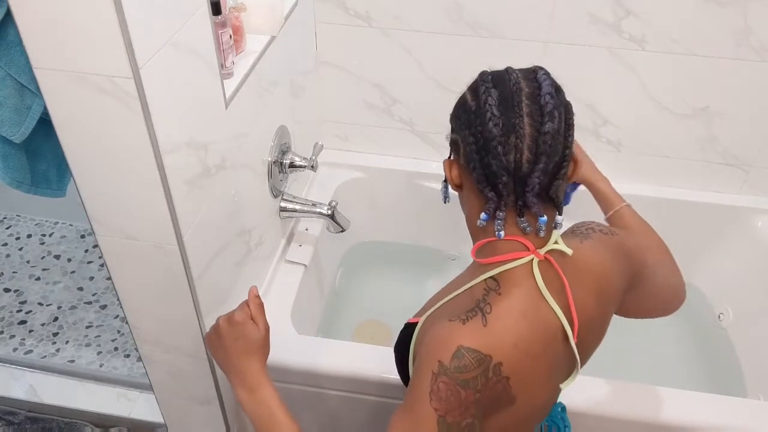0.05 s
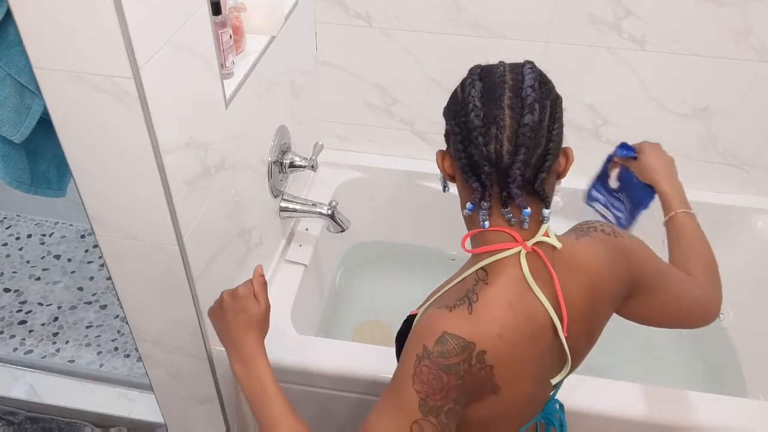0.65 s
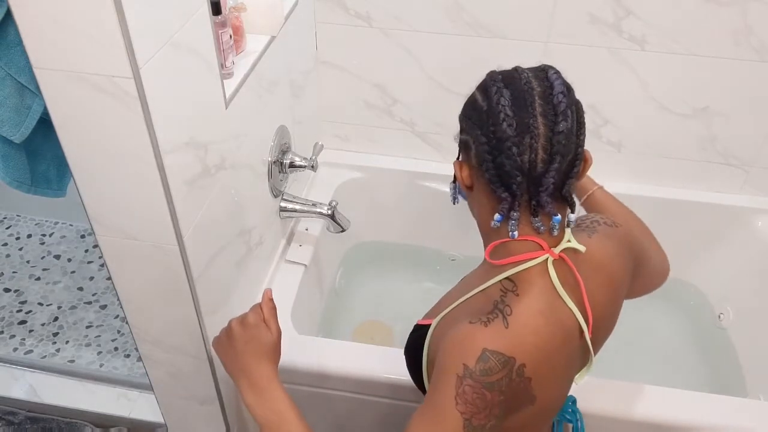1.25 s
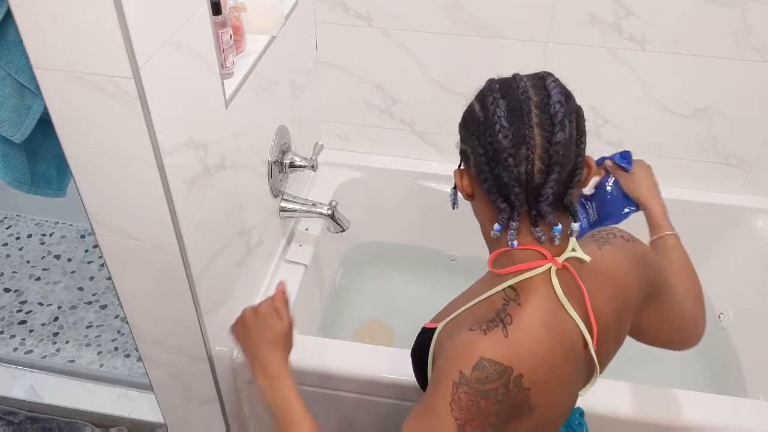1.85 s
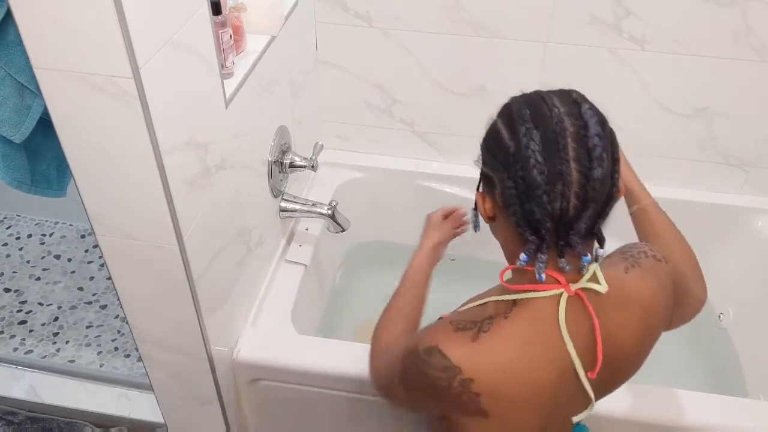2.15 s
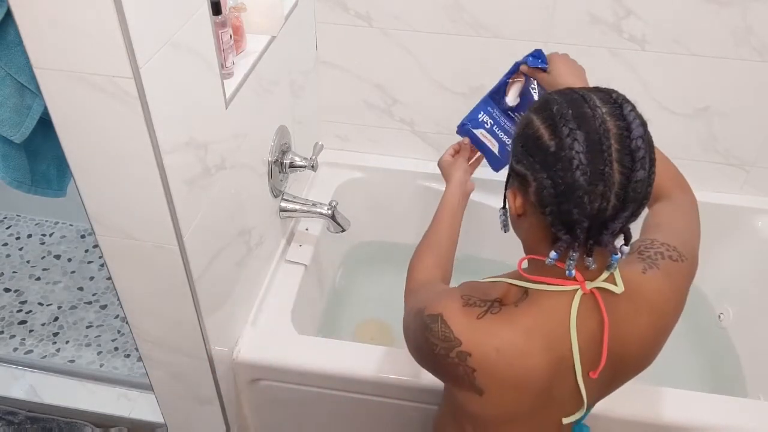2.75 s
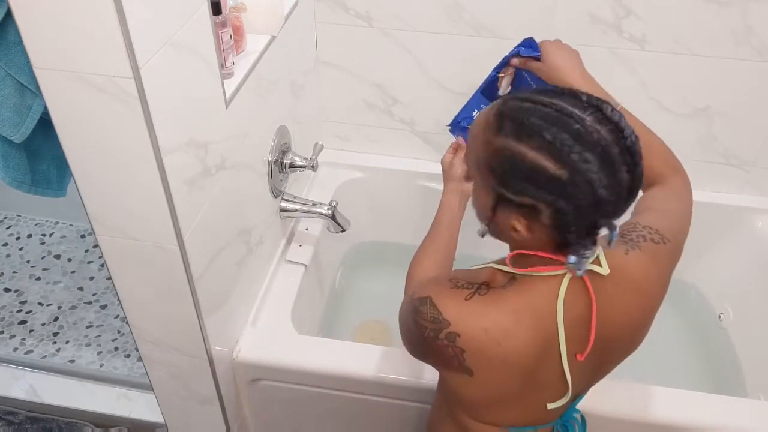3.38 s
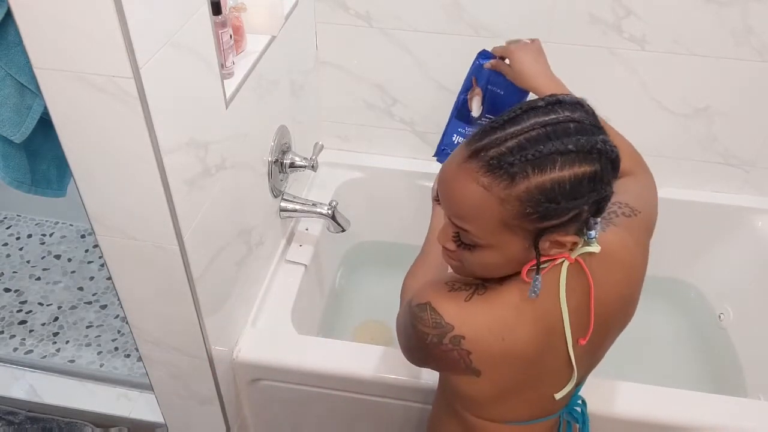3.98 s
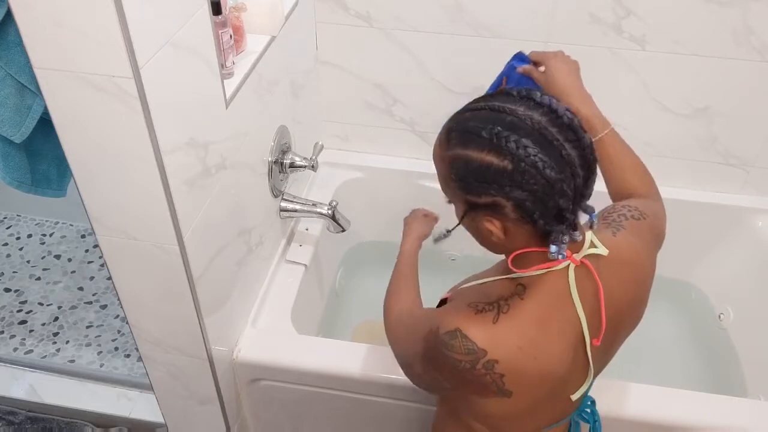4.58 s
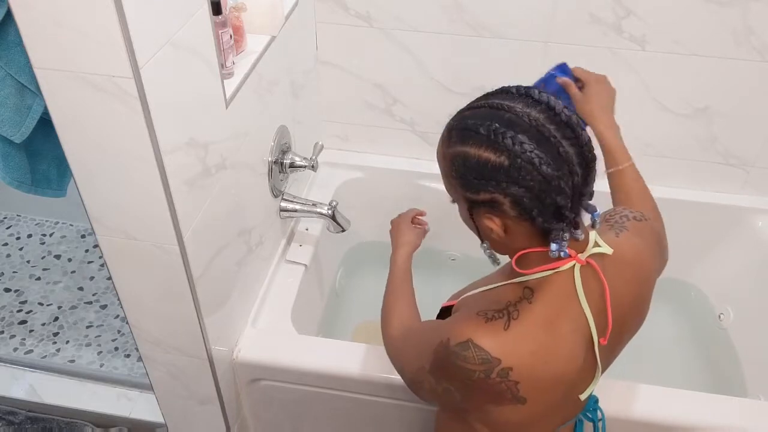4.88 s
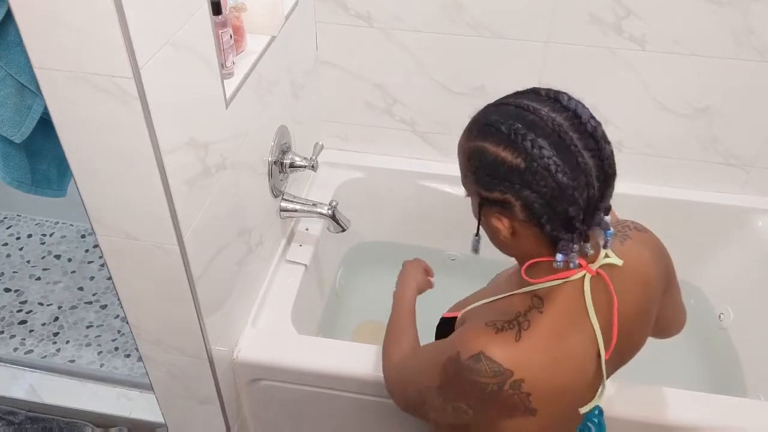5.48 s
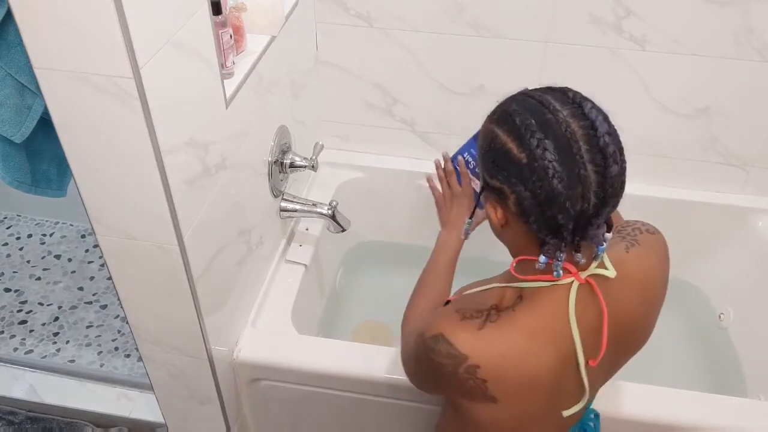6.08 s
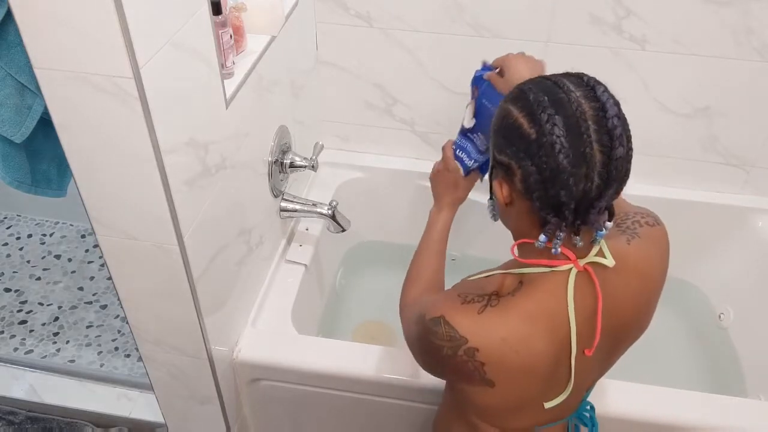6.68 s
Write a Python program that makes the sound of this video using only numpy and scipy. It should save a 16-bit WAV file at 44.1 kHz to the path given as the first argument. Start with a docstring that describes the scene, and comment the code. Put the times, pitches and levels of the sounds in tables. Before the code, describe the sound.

A stiff plastic pouch is shaken and crumpled, sending bursts of salt crystals hissing into bathwater, with a few small plinks.

```python
"""A bright patter of bath salt, running from a plastic pouch into a filled tub in a small, hard-walled room.
The crystals hit the water and pull down tiny bubbles that fizz; now and then a larger one plinks.
The pouch is turned over, crumpled and shaken, so the salt comes in spurts. Its stiff film crackles
and snaps and its panels thump, over a faint rumble of the house."""
import sys
import numpy as np
from scipy import signal
from scipy.fft import rfft, irfft
from scipy.io import wavfile

SR = 44100
rng = np.random.default_rng(int(sys.argv[2]) if len(sys.argv) > 2 else 0)


def store_pcm(level_fs):
    """Save levels as 16-bit WAV."""
    pcm = np.round(np.clip(level_fs, -1, 1) * 32767).astype(np.int16)
    wavfile.write(sys.argv[1], SR, np.atleast_2d(pcm).T)


N = 296748
TIME = np.arange(N) / SR


def from_db(db):
    """Decibels to gain."""
    return 10 ** (np.asarray(db) / 20)


def unit_rms(x):
    """Scale to unit power."""
    return x / np.sqrt(np.mean(x ** 2) + 1e-20)


def automation(points):
    """A curve of (time_s, value) points, read at every sample."""
    return np.interp(TIME, *np.transpose(points))


def at_hz(points, hz):
    """Read a table along a logarithmic frequency axis."""
    freqs, values = np.transpose(points)
    return np.interp(np.log(np.maximum(hz, 1)), np.log(freqs), values)


def add(track, start_s, sound):
    """Lay a sound into a track."""
    start = int(np.clip(start_s * SR, 0, N - 1))
    track[start:start + len(sound)] += sound[:N - start]


def drift(rate_hz):
    """Slow random wobble of unit power."""
    hop, settle = 40, 2000
    pole = np.exp(-2 * np.pi * rate_hz * hop / SR)
    noise = rng.standard_normal(N // hop + settle + 2)
    slow = signal.lfilter([1], [1, -2 * pole, pole * pole], noise)[settle:]
    return np.interp(np.arange(N) / hop, np.arange(len(slow)), unit_rms(slow))


def colour(x, spectrum, size=4096):
    """Minimum-phase EQ with the given shape; white input keeps its power."""
    hz = np.abs(np.fft.fftfreq(size, 1 / SR))
    log_gain = np.log(from_db(at_hz(spectrum, hz)))
    response = np.fft.ifft(np.exp(np.conj(signal.hilbert(log_gain)))).real[:size // 2]
    return signal.oaconvolve(x, response / np.linalg.norm(response))[:N]


def resonate(x, pitch_hz, width_hz):
    """One resonance; white input keeps its power."""
    radius = np.exp(-np.pi * width_hz / SR)
    feedforward = np.sqrt((1 - radius ** 2) / 2) * np.array([1, 0, -1])
    feedback = [1, -2 * radius * np.cos(2 * np.pi * pitch_hz / SR), radius ** 2]
    return signal.lfilter(feedforward, feedback, x + 1e-18)


def grains(per_s, spread_db):
    """Random clicks of uneven size, with unit mean power at any rate."""
    chance = np.clip(per_s / SR, 1e-5, 1)
    sizes = from_db(spread_db * np.minimum(rng.exponential(1, N), 4.5)) * rng.choice([-1, 1], N)
    return (rng.random(N) < chance) * unit_rms(sizes) / np.sqrt(chance)


def with_swells(bed_db, swells, rise_share):
    """Level in dB of a bed plus swells, each with an attack that is a share of its fall time."""
    power = from_db(bed_db) ** 2
    for peak_s, level_db, fall_s in swells:
        near = slice(*np.searchsorted(TIME, [peak_s - 10 * fall_s, peak_s + 10 * fall_s]))
        age = (TIME[near] - peak_s) / fall_s
        envelope = np.exp(-np.where(age < 0, (age / rise_share) ** 2 / 2, age))
        power[near] += (from_db(level_db) * envelope) ** 2
    return 10 * np.log10(power)


# tone of the quiet house: freq_hz, gain_db
ROOM_TONE_EQ = [(15, -32), (27, -17), (42, 7), (65, -11), (110, -0.5), (150, -12), (230, -5.5),
                (400, -17.5), (1000, -20), (3000, -17.5), (8000, -22.5), (15000, -24.5)]


def room_tone():
    """Faint rumble and hiss of the house, partly shared by both channels."""
    common, left, right = (colour(white, ROOM_TONE_EQ) for white in rng.standard_normal((3, N)))
    return from_db(-67.5) * (common + 0.71 * np.array([left, right]))


# reverb time of the bathroom: freq_hz, t60_s
REVERB_DECAY = [(100, 1), (500, 0.49), (2000, 0.33), (6000, 0.62), (15000, 0.22)]
# how alike the reverb is left and right: freq_hz, correlation
REVERB_LIKENESS = [(100, 0.65), (350, 0.9), (700, 0.18), (1400, -0.058), (3000, 0.07), (12000, -0.053)]
# lean of the stereo image: freq_hz, left_over_right_db
BALANCE = [(100, 5), (1000, 2), (5000, 2), (8000, 2), (12000, -1.8)]


def bathroom(x, direct_db, early_boost, early_s, size=16384):
    """A sound from one spot: a weak direct path, then dense echoes off tub and tile."""
    t, response = TIME[:size], np.zeros((2, size))
    hz = np.fft.rfftfreq(size, 1 / SR)
    octave = np.log2(np.clip(hz, 125, 16000) / 125)
    noise = rfft(rng.standard_normal((2, size)))
    sides = np.array([[1], [-1]])
    for k in range(8):
        centre_hz, band = 125 * 2 ** k, np.maximum(1 - np.abs(octave - k), 0)
        mid, side = irfft(noise * band)
        alike = at_hz(REVERB_LIKENESS, centre_hz)
        echoes = np.sqrt((1 + alike) / 2) * mid + np.sqrt((1 - alike) / 2) * side * sides
        decay = np.exp(-np.log(1000) * t / at_hz(REVERB_DECAY, centre_hz))
        decay *= 1 + early_boost * np.exp(-t / early_s)  # the tub walls answer first
        response += echoes * decay / np.linalg.norm(decay)
    # the direct sound reaches the left a few samples sooner
    response[[0, 1], [0, rng.integers(3, 12)]] += from_db(direct_db)
    response = irfft(rfft(response) * from_db(sides * at_hz(BALANCE, hz) / 2))
    return signal.fftconvolve(x[None], response, axes=1)[:, :N]


def scatter(x, dwell_s, spots=12):
    """Hits and creases crossfade from spot to spot, each with its own pattern of echoes."""
    visits = np.concatenate([rng.permutation(spots) for _ in range(200)])
    step = TIME / dwell_s
    now, fade = step.astype(int), step % 1 * np.pi / 2
    leaving, arriving = x * np.cos(fade), x * np.sin(fade)
    out = np.zeros((2, N))
    for spot in range(spots):
        part = leaving * (visits[now] == spot) + arriving * (visits[now + 1] == spot)
        out += bathroom(part, direct_db=-10, early_boost=1, early_s=0.031)
    return out


# how hard the hands work the pouch, the bed under thumps and creases: time_s, level_db
HANDLING_LEVEL = [(0, -56), (1.0, -53.5), (1.4, -48.5), (1.82, -55.5), (2.2, -76), (2.6, -51.5),
                  (3.25, -43), (3.9, -53.5), (4.15, -60), (4.6, -58.5), (5.04, -67), (5.12, -49),
                  (5.6, -51.5), (5.95, -69.5), (6.17, -54), (6.35, -63.5), (6.46, -43.5), (6.73, -60)]
# lurches of the pouch: peak_s, deep_db, panel_db, fall_s
POUCH_LURCHES = [(0.82, -62, -78, 0.033), (1.33, -77, -64, .06), (2.485, -56.5, -51, 0.039),
                 (2.76, -63.5, -62, 0.18), (3.03, -74, -50, 0.087), (3.18, -59, -59, .07),
                 (3.385, -58, -56, 0.099), (3.66, -56, -55, 0.065), (3.91, -65, -53.5, 0.052),
                 (4.25, -60, -65, 0.049), (6.04, -64, -66, .04), (6.12, -65, -65, 0.11),
                 (6.41, -61.5, -63.5, 0.12), (6.68, -64, -59, 0.097)]
# low resonances of tub and room: pitch_hz, width_hz, gain_db
LOW_MODES = [(44.7, 24, -5.5), (90.6, 12, 3.5), (119, 27, -4.5), (167.4, 15, -2.5), (226, 5.2, -2.5),
             (275.7, 8.9, 4.5), (316, 20, -9), (433, 62, -3)]


def pouch_thumps():
    """The swaying, lurching pouch drives the low resonances: its bulk the deepest, its panels the rest."""
    handling_db = automation(HANDLING_LEVEL)
    deep_swells = [(s, db, fall_s) for s, db, _, fall_s in POUCH_LURCHES]
    panel_swells = [(s, db, fall_s) for s, _, db, fall_s in POUCH_LURCHES]
    deep_db = with_swells(handling_db - 22, deep_swells, rise_share=0.55)
    panel_db = with_swells(handling_db - 21, panel_swells, rise_share=0.55)
    push = grains(900, spread_db=1)
    deep, panel = from_db(deep_db - 5.5) * push, from_db(panel_db - 7.5) * push
    return sum(from_db(gain_db) * resonate(deep if hz < 150 else panel, hz, width_hz)
               for hz, width_hz, gain_db in LOW_MODES)


# squeezes that crumple the film: peak_s, level_db, fall_s
POUCH_SQUEEZES = [(0.28, -50.5, .06), (0.85, -45, .025), (1.44, -51, .04), (2.335, -51.5, 0.05),
                  (2.485, -46.5, 0.036), (3.025, -40, 0.037), (3.2, -41, 0.051), (3.635, -40, .075),
                  (3.965, -43.5, 0.068), (4.22, -47, 0.028), (5.23, -54, .04), (5.53, -50, .04),
                  (6.048, -40.5, 0.011), (6.135, -47.5, 0.033), (6.455, -46, 0.043), (6.59, -45, 0.019),
                  (6.685, -41, .03)]
# midrange body of the film: freq_hz, gain_db
FILM_EQ = [(100, -31.5), (250, -20.5), (430, -6.5), (600, 0.5), (760, 0.5), (980, 3), (1170, -4),
           (1420, 7.5), (1950, 0), (3000, 0), (6000, -39), (15000, -23)]


def film_creases():
    """The film crumples in many small creases, loudest at each squeeze."""
    crumple_db = with_swells(automation(HANDLING_LEVEL), POUCH_SQUEEZES, rise_share=0.39)
    envelope = from_db(crumple_db - 1.5 + 1.2 * drift(rate_hz=9.4))
    return colour(envelope * grains(1800, spread_db=4), FILM_EQ)


# buckles and shakes of the pouch: start_s, level_db, ring_hz, ring_gain_db, decay_s
BUCKLES = [(0.257, -37, 1410, -3, 0.0086), (0.461, -40, 1930, 7, 0.013), (0.573, -39.5, 2800, 1.5, 0.041),
           (1.314, -42, 2580, 1, 0.014), (1.726, -35, 3300, -10, 0.013), (2.052, -48.5, 5000, 4, 0.0079),
           (2.448, -52, 1520, 7, 0.038), (2.625, -36, 3180, 4, 0.0051), (2.875, -32.5, 2420, 2, 0.0056),
           (2.947, -39, 1000, 5, 0.0051), (3.01, -35.5, 900, 1.5, .005), (3.044, -33.5, 520, -6, 0.0057),
           (3.162, -26, 1600, -3, 0.0052), (3.341, -21.5, 1870, 0, 0.007), (3.628, -34.5, 780, -2.5, 0.023),
           (3.66, -44.5, 1560, 5, 0.12), (3.855, -40.5, 9100, 1, 0.018), (4.192, -51, 3720, 4, 0.076),
           (5.09, -46, 1420, 3.5, 0.059), (5.216, -34.5, 2200, 6, 0.024), (5.245, -39, 1010, -2.5, 0.027),
           (5.41, -37, 4430, 4.5, 0.0073), (5.922, -50, 6000, -4, 0.012), (5.978, -52, 2100, 15, 0.0094),
           (6.036, -50, 1550, 12, 0.0066), (6.107, -35.5, 860, 0, 0.0057), (6.193, -43.5, 1890, -7, 0.0097),
           (6.385, -45, 1410, -8, .016), (6.404, -33.5, 1410, -1.5, 0.01), (6.464, -39, 1360, 0.5, 0.024),
           (6.576, -49, 1260, 2, 0.02), (6.641, -33, 855, -5, 0.0094), (6.679, -47.5, 2360, 11, 0.028)]
# bright edge of a crack: freq_hz, gain_db
CRACK_EQ = [(200, -38), (900, -36), (1800, 16.5), (2800, 16), (5300, 10), (7500, 1.5), (10500, 7.5),
            (15000, -7)]


def film_snaps():
    """A buckle starts with a crack, runs out in crackle and rings one stretch of film."""
    crackle = grains(12000, spread_db=-0.5)
    cracks, rings, body = np.zeros((3, N))
    for start_s, level_db, ring_hz, ring_gain_db, decay_s in BUCKLES:
        burst = crackle[int(start_s * SR):][:SR // 5]
        burst = from_db(level_db + 0.5) * burst * np.exp(-TIME[:len(burst)] / decay_s)
        add(cracks, start_s, burst)
        add(rings, start_s, from_db(ring_gain_db) * resonate(burst, ring_hz, width_hz=0.28 * ring_hz))
    # the sagging pouch answers a moment after the crack
    add(body, 0.001, from_db(-5) * colour(cracks, FILM_EQ))
    return colour(cracks, CRACK_EQ) + body + rings


def bubble(pitch_hz, cycles, rise):
    """A sine that dies by 60 dB over its cycles and bends up as the bubble nears the surface."""
    age = np.arange(int(cycles / pitch_hz * SR) + 2) * pitch_hz / SR
    return np.sin(2 * np.pi * age * (1 + rise * age / cycles)) * np.exp(-np.log(1000) * age / cycles)


# larger bubbles: start_s, pitch_hz, level_db
LARGE_BUBBLES = [(1.687, 1360, -39), (1.836, 1580, -37), (2.069, 2410, -37.5), (4.185, 1740, -35.5),
                 (4.509, 1200, -39.5), (4.949, 1630, -35.5), (5.008, 1125, -46), (5.033, 1095, -48)]


def plinks():
    """Now and then a clump of salt traps a larger bubble."""
    out = np.zeros(N)
    for start_s, pitch_hz, level_db in LARGE_BUBBLES:
        add(out, start_s, from_db(level_db) * bubble(pitch_hz, cycles=60, rise=0.0051))
    return out


# brightness, following the share of fine crystals in the stream: time_s, treble_db
TREBLE_RIDE = [(0, 2), (.8, -2.5), (2.0, 2.5), (2.35, -3.5), (2.65, -1), (2.9, 2.5), (3.35, -3.5),
               (3.65, -3), (3.9, 3), (4.4, 0.5), (5.4, 3), (6.15, 2), (6.5, -4.5), (6.73, 4)]


def ride_treble(x):
    """A moving high shelf brightens and dulls the salt, and the film along with it."""
    treble = signal.sosfilt(signal.butter(1, 6500, "high", fs=SR, output="sos"), x)
    return x + (from_db(automation(TREBLE_RIDE)) - 1) * treble


# trickle under the spurts, drying up whenever the pouch is righted: time_s, level_db
TRICKLE_LEVEL = [(0, -42.5), (1.45, -41), (1.77, -44), (2.17, -66), (2.33, -54.5), (2.75, -49.5),
                 (3.3, -42), (3.97, -45), (4.15, -54.5), (4.36, -46), (4.8, -47.5), (5.06, -56.5),
                 (5.45, -46), (5.76, -52), (5.89, -61.5), (6.19, -51), (6.33, -67), (6.73, -55)]
# one spurt a shake, about seven a second in the first pour: peak_s, level_db, fall_s
SALT_SPURTS = [(0.095, -47, 0.016), (0.295, -43, 0.07), (0.475, -38.5, 0.013), (0.595, -39, 0.03),
               (0.728, -40.5, 0.038), (0.86, -47, .03), (1.009, -40, 0.032), (1.171, -36.5, 0.038),
               (1.324, -38.5, 0.048), (1.46, -38, 0.028), (1.605, -38, .02), (1.743, -41, 0.022),
               (2.0, -57, 0.1), (2.485, -40.5, 0.029), (2.895, -46.5, 0.016), (3.04, -45, 0.028),
               (3.362, -39.5, 0.01), (3.652, -41, 0.089), (3.895, -45.5, 0.019), (4.081, -43.5, 0.033),
               (4.234, -41, 0.06), (4.375, -45, 0.032), (4.545, -43, 0.036), (4.69, -45.5, 0.031),
               (4.94, -50, 0.028), (5.125, -42, 0.032), (5.231, -30, 0.035), (5.449, -39, 0.056),
               (5.594, -37.5, 0.038), (6.424, -41.5, 0.026), (6.66, -45, 0.027)]
# tone of crystals hitting water: freq_hz, gain_db
PATTER_EQ = [(150, -44), (400, -30.5), (720, -13.5), (1000, -11.5), (1500, -6), (2400, -2), (3300, -1.5),
             (5300, -3.5), (6400, -7), (7600, -9.5), (10000, -7), (12500, -9.5), (15000, -14.5)]


def salt_pour():
    """Crystals hit the water and pull down tiny bubbles; more flow means denser hits and louder fizz."""
    level_db = with_swells(automation(TRICKLE_LEVEL), SALT_SPURTS, rise_share=0.8)
    flow = from_db(level_db - np.max(level_db))
    patter = colour(grains(14000 * flow + 300, spread_db=2), PATTER_EQ)
    fizz = np.zeros(N)
    for when, pitch, softness in rng.random((2200, 3)):
        ping = bubble(pitch_hz=1900 * 3 ** pitch, cycles=113, rise=0.043)
        add(fizz, when * N / SR, from_db(-22 * softness) * ping)
    envelope = from_db(level_db + 0.5 * drift(rate_hz=12))
    return envelope * (from_db(3.5) * patter + from_db(-9.5) * unit_rms(fizz))


def scene():
    """Salt and creases spread through the room; snaps and plinks each sit at one spot, more direct."""
    scattered = scatter(ride_treble(salt_pour() + film_creases()), dwell_s=0.012)
    snaps = bathroom(ride_treble(film_snaps()), direct_db=-8, early_boost=0.89, early_s=0.015)
    bubbles = bathroom(plinks(), direct_db=-7, early_boost=0.89, early_s=0.015)
    thumps = pouch_thumps() * from_db([[1], [-1]])  # slightly left
    return scattered + snaps + bubbles + thumps + room_tone()


def record(dry):
    """A steep low-pass takes off the top above 15.3 kHz."""
    return signal.sosfilt(signal.ellip(12, 0.1, 85, 15300, fs=SR, output="sos"), dry)


dry = scene()
out = record(dry)
store_pcm(out)
```